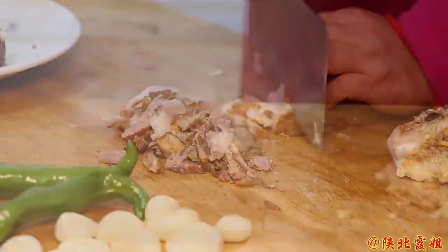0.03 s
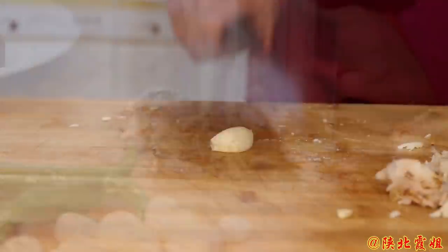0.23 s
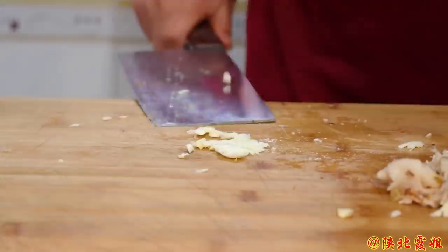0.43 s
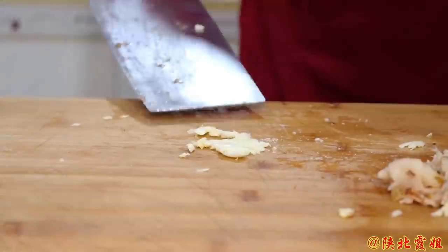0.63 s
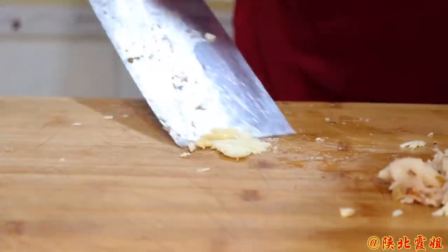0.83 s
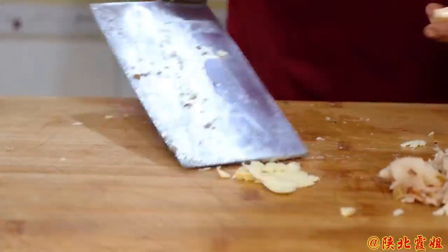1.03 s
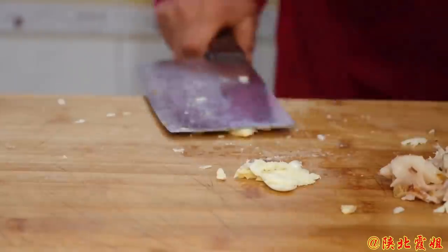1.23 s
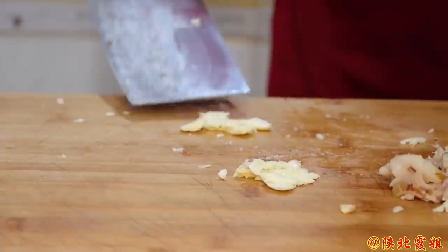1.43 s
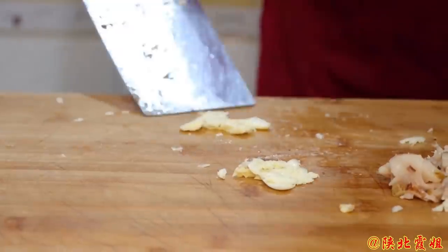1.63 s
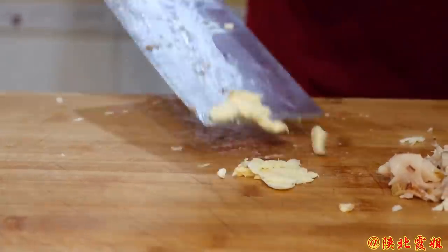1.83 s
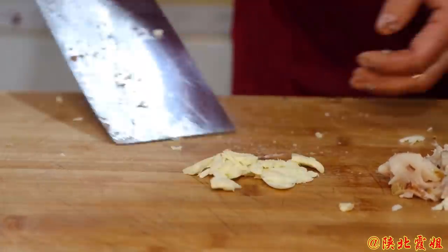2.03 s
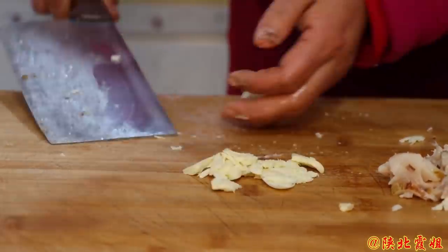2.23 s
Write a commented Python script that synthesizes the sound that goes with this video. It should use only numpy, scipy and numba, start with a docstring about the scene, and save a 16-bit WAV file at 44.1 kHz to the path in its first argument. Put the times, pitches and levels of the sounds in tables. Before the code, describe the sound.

A flat cleaver smashes garlic on a wooden board close by: two heavy, crunching blows among lighter slaps and knocks. The steel rings briefly and wipes softly between hits, in a kitchen with a short echo and faint hum.

```python
"""A wide steel cleaver, laid flat, smashes garlic on a wooden board: two heavy blows, three slaps,
two light knocks. Each thuds in the board, claps and rings in the blade, crunches the clove and booms
in the counter. Between blows the blade wipes off the pulp. A hard-walled kitchen echoes and hums.
Gain control clamps a moment late, so loud attacks clip and the echo is held level before it dies."""
import sys
import numpy as np
from scipy import signal
from scipy.fft import rfft, irfft
from scipy.io import wavfile
from numba import njit

SR = 44100
rng = np.random.default_rng(int(sys.argv[2]) if len(sys.argv) > 2 else 0)


def dump(signal):
    """Clip the signal to [-1, 1] and save it as 16-bit WAV at the path in sys.argv[1]."""
    limited = np.clip(np.atleast_2d(signal).T, -1, 1)
    pcm = np.round(limited * 32767).astype(np.int16)
    wavfile.write(sys.argv[1], SR, pcm)


N = 105840

# Room hum spectrum: freq_hz, level_db
HUM_SPECTRUM = [(25, 2), (60, 10), (110, 6), (175, 18.5), (280, 3.5), (600, -7), (1500, -5), (4000, -13.5),
                (9000, -17.5), (15000, -23)]
# Wall echo spectrum: freq_hz, level_db
ECHO_SPECTRUM = [(40, -8.5), (75, 5.5), (110, 11.5), (140, -8), (175, 12.5), (270, -1), (370, 0),
                 (600, -1.5), (1100, 7.5), (2300, -0.5), (5000, 8.5), (10000, 5.5), (16000, 14)]
# Wall echo decay: freq_hz, t60_s
ECHO_DECAY = [(100, 0.49), (300, 0.48), (1000, 0.46), (2500, 0.45), (5000, 0.4), (9000, 0.32),
              (15000, 0.11)]
# Blade wiping over pulp: peak_s, half_length_s, level_db
WIPE_SWELLS = [(0.824, 0.06, -44), (1.69, 0.053, -35.5)]
# Wipe hiss spectrum: freq_hz, level_db
WIPE_SPECTRUM = [(200, -25), (1000, 16.5), (3000, 7.5), (5000, 6), (9000, 8), (13500, 3), (16000, -17)]
# Steel singing as it slips: peak_s, half_length_s, level_db
ZING_SWELLS = [(0.787, 0.024, -39.5), (1.726, .011, -31)]
# Rubbed blade modes: pitch_hz, level_db, t60_s
ZING_MODES = [(4058, -0.5, 0.38), (5000, -22, .15), (8440, -6, 0.038), (9900, 1.5, 0.14)]
# Counter modes: pitch_hz, level_db, t60_s
COUNTER_MODES = [(87, -16, .7), (108, -12, .7), (122, -12, .7), (158, 0, .9), (177, -9, .45),
                 (212, -12, .6)]
# Board modes: pitch_hz, level_db, t60_s
BOARD_MODES = [(121.6, -16, 0.062), (185.7, -14, 0.04), (369, -7, 0.038), (538.6, -1.5, 0.044),
               (701, 1, 0.017), (861, -2.5, 0.023), (936, -2.5, 0.028), (1233, -4, 0.02), (1456, -5, 0.028),
               (1647, -2, 0.019), (1900, -1.5, 0.051)]
# Blade modes on landing: pitch_hz, level_db, t60_s
CLAP_MODES = [(560, -34, 0.12), (908, -38.5, 0.01), (1417, -10, 0.065), (1904, -1, 0.075),
              (2183, 13.5, 0.0078), (2453, 10, 0.012), (2712, 1, 0.025), (3194, 1, 0.014),
              (3850, -26.5, 0.0087), (5090, -11.5, 0.012), (6860, -5, 0.0062)]
# Free blade modes: pitch_hz, level_db, t60_s
RING_MODES = [(550, 2, .55), (962, -1, .6), (1425, -12, .5), (1891, 0, .78), (2446, 2, .42),
              (3270, -18, .4), (4059, -15, .9), (5233, -18, .7), (6675, -18, .35), (8300, -14, .45),
              (9835, -11, .5)]
# Bursting clove spectrum: freq_hz, level_db
CRUNCH_SPECTRUM = [(40, -11.5), (300, -1.5), (1000, -19), (3000, 3.5), (5000, -4.5), (7500, -8.5),
                   (10000, -8), (13000, -16), (16000, -44)]
# Blade and board rattling back together: start_s, board_db, clap_db
BLADE_REBOUNDS = [(0.2353, -3, 2.5), (.2422, 2, -2), (.2505, 8, -25), (0.6582, -15, -9.5),
                  (.6600, -10.5, -42), (1.0907, 3, 18.5), (1.5530, -5, -5), (1.9296, -6.5, -16.5),
                  (2.1156, -19, -29), (2.1222, -16.5, -34)]
# Cleaver blows: start_s, board_db, clap_db, crunch_db, ring_db, favoured_hz, counter_db, give_way_s
CLEAVER_BLOWS = [(.2228, 6.5, 6.5, 7, -21, 1400, -11.5, 0.0017),
                 (.6521, -16.5, -9, -16.5, -25, 2900, -21.5, 0.000091),
                 (1.0832, 19, 10, 12.5, -12, 2000, -6, 0.0031),
                 (1.5483, -15.5, -6, -11.5, -11.5, 1900, -20, 0.000064),
                 (1.9235, -6.5, -2, -12.5, -12, 840, -29, 0.00015),
                 (2.006, -16.5, -42, -46, -52, 570, -62, 0.00011),
                 (2.1100, -16.5, -27, -35.5, -31, 1000, -26, 0.00056)]

HUM_DB, HUM_ALIKE_HZ = -49.5, 483
ECHO_DB, ECHO_RIGHT_DB, ECHO_BUILD_S, ECHO_ALIKE_HZ = -0.5, 2, 0.0032, 755
SCATTER_DB, SCATTER_DECAY_S = -2, 0.002
CRUNCH_DECAY_S, GRAIN_SPREAD_DB = 0.0078, 4.5
SPRAY_SHARE, SPRAY_DECAY_S = 0.29, 0.046
RING_FOCUS_DB_PER_OCTAVE, OPENING_RING_GAIN_DB = 2, -68
BOARD_SOFT_HZ, CLAP_SOFT_HZ = 1900, 5560  # contact too slow to excite much above these
DIRECT_RIGHT_DB, LEFT_LAG_S = 1.5, 0.00002
HOLD_DB, SENSE_S, CLAMP_S, RECOVER_S = -18.5, 0.00027, 0.0049, 0.04
LOW_CUT_HZ, HIGH_CUT_HZ = 83, 15500
BIN_HZ = np.fft.rfftfreq(N, 1 / SR)


def undb(db):
    return 10 ** (np.asarray(db) / 20)


def unit_rms(x):
    return x / np.sqrt(np.mean(x ** 2))


def burst(x):
    """Scale to the energy of 10 ms at full level."""
    return x * np.sqrt(SR / 100 / np.sum(x ** 2))


def on_log_axis(points):
    freq_hz, values = np.array(points).T
    return np.interp(np.log(BIN_HZ + 1), np.log(freq_hz), values)


def colour(x, spectrum):
    return irfft(rfft(x) * undb(on_log_axis(spectrum)), N)


def soften(x, cutoff_hz):
    return signal.sosfilt(signal.butter(2, cutoff_hz, fs=SR, output="sos"), x)


def through(x, response):
    return signal.fftconvolve(np.atleast_2d(x), np.atleast_2d(response), axes=1)[:, :N]


def modes(table):
    """Body response: decaying modes of alternating polarity."""
    t = np.arange(N) / SR
    return sum((-1) ** k * undb(db - 60 * t / t60_s) * np.cos(2 * np.pi * hz * t)
               for k, (hz, db, t60_s) in enumerate(table))


def add(track, start_s, sound):
    i = int(start_s * SR)
    track[i:] += sound[:N - i]


def stereo_noise(alike_hz):
    """Diffuse noise: shared below alike_hz, unrelated above."""
    share = 1 / (1 + (BIN_HZ / alike_hz) ** 2)
    common = np.sqrt(share) * rfft(rng.standard_normal(N))
    separate = np.sqrt(1 - share) * rfft(rng.standard_normal((2, N)))
    return irfft(common + separate, N)


def pan(right_db):
    return undb(np.array([[-right_db], [right_db]]) / 2)


def swell(t, peak_s, half_length_s, level_db):
    return undb(level_db) * np.exp(-.5 * ((t - peak_s) / half_length_s) ** 2)


def room_hum():
    """Steady diffuse noise, strongest in the bass."""
    return undb(HUM_DB) * unit_rms(colour(stereo_noise(HUM_ALIKE_HZ), HUM_SPECTRUM))


def wall_echo(knock, t):
    """Diffuse echo off hard walls; treble dies first."""
    spectrum = rfft(colour(stereo_noise(ECHO_ALIKE_HZ), ECHO_SPECTRUM))
    tail = 0
    for centre_hz, t60_s in ECHO_DECAY:
        band = on_log_axis([(hz, float(hz == centre_hz)) for hz, _ in ECHO_DECAY])
        tail += irfft(spectrum * band, N) * undb(-60 * t / t60_s)
    tail *= 1 - np.exp(-t / ECHO_BUILD_S)
    return through(knock, undb(ECHO_DB) * unit_rms(tail) / np.sqrt(N) * pan(ECHO_RIGHT_DB))


def near_scatter(knock, t):
    """Reflections off worktop, hands and blade; new for each blow."""
    starts_s = [row[0] for row in CLEAVER_BLOWS]
    blow_index = np.searchsorted(starts_s, t + 1 / SR) - 1
    reflections = 0
    for k in range(len(starts_s)):
        response = unit_rms(rng.standard_normal((2, N)) * np.exp(-t / SCATTER_DECAY_S)) / np.sqrt(N)
        reflections += through(knock * (blow_index == k), response)
    return undb(SCATTER_DB) * reflections


def blade_rubbing(t):
    """Wet steel hisses over pulp, sings in its high modes, finally slides on wood."""
    friction = rng.standard_normal(N)
    hiss = unit_rms(colour(friction, WIPE_SPECTRUM))
    steel = unit_rms(through(friction, modes(ZING_MODES))[0])
    wood = unit_rms(soften(through(friction, modes(BOARD_MODES))[0], cutoff_hz=1000))
    wipes = hiss * sum(swell(t, *row) for row in WIPE_SWELLS)
    zings = steel * sum(swell(t, *row) for row in ZING_SWELLS)
    slide = wood * swell(t, peak_s=2.385, half_length_s=0.018, level_db=-40)
    return wipes + zings + slide


def clove_crunch(t):
    """The clove cracks in grainy noise, then pulp squirts out."""
    grains = undb(GRAIN_SPREAD_DB * np.repeat(rng.standard_normal(N // 20 + 1), 20)[:N])
    envelope = np.exp(-t / CRUNCH_DECAY_S) + SPRAY_SHARE * np.exp(-t / SPRAY_DECAY_S)
    return burst(colour(rng.standard_normal(N) * grains, CRUNCH_SPECTRUM) * envelope)


def blade_ring(favoured_hz):
    """Free ring; the contact point favours modes near favoured_hz."""
    return burst(modes([(hz, db - RING_FOCUS_DB_PER_OCTAVE * abs(np.log2(hz / favoured_hz)), t60_s)
                        for hz, db, t60_s in RING_MODES]))


def cleaver_blows(t):
    """Board and counter sound first; the clove gives way, the steel claps, rattles and rings on."""
    board = burst(soften(modes(BOARD_MODES), BOARD_SOFT_HZ))
    clap = burst(soften(modes(CLAP_MODES), CLAP_SOFT_HZ))
    counter = burst(modes(COUNTER_MODES))
    knock = np.zeros(N)
    strongest_mode = max(RING_MODES, key=lambda mode: mode[1])
    sustain = undb(OPENING_RING_GAIN_DB) * modes([strongest_mode])  # blade already ringing faintly
    for blow in CLEAVER_BLOWS:
        start_s, board_db, clap_db, crunch_db, ring_db, favoured_hz, counter_db, give_way_s = blow
        landing_s = start_s + give_way_s
        add(knock, start_s, undb(board_db) * board)
        add(sustain, start_s, undb(counter_db) * counter)
        add(knock, landing_s, undb(clap_db) * clap + undb(crunch_db) * clove_crunch(t))
        add(sustain, landing_s, undb(ring_db) * blade_ring(favoured_hz))
    for start_s, board_db, clap_db in BLADE_REBOUNDS:
        add(knock, start_s, undb(board_db) * board + undb(clap_db) * clap)
    return knock, sustain


def scene():
    """Board close by, slightly right, in the kitchen's hum and echo."""
    t = np.arange(N) / SR
    knock, sustain = cleaver_blows(t)
    left, right = (knock + near_scatter(knock, t) + sustain + blade_rubbing(t)) * pan(DIRECT_RIGHT_DB)
    left = irfft(rfft(left) * np.exp(-2j * np.pi * BIN_HZ * LEFT_LAG_S), N)
    return np.array([left, right]) + room_hum() + wall_echo(knock, t)


@njit
def follow(x, rise_s, fall_s):
    """Level follower with separate rise and fall times."""
    levels, level = np.empty(len(x)), 0.
    for i in range(len(x)):
        level += (x[i] - level) / (SR * (rise_s if x[i] > level else fall_s))
        levels[i] = level
    return levels


def record(dry):
    """Gain control holds loud sound at one level; what slips past clips. Band limits follow."""
    pole = np.exp(-1 / (SENSE_S * SR))
    power = signal.lfilter([1 - pole], [1, -pole], np.mean(dry ** 2, axis=0))
    excess_db = np.maximum(10 * np.log10(power + 1e-12) - HOLD_DB, 0)
    held = dry * undb(-follow(excess_db, CLAMP_S, RECOVER_S))
    low_cut = signal.butter(1, LOW_CUT_HZ, "high", fs=SR, output="sos")
    high_cut = signal.ellip(8, .2, 60, HIGH_CUT_HZ, fs=SR, output="sos")
    return signal.sosfilt(high_cut, signal.sosfilt(low_cut, np.clip(held, -1, 1)))


dry = scene()
out = record(dry)
dump(out)
```